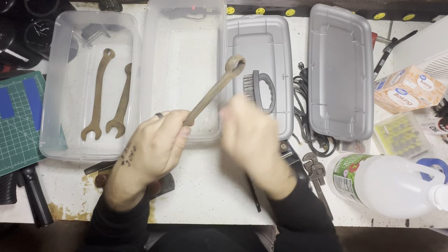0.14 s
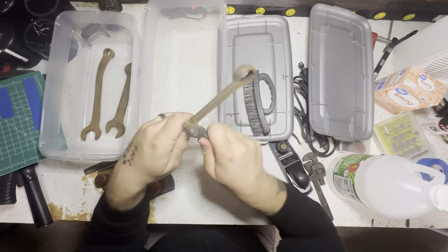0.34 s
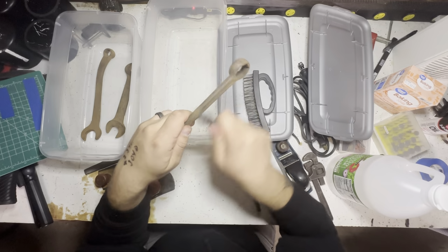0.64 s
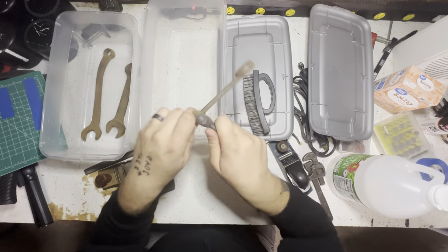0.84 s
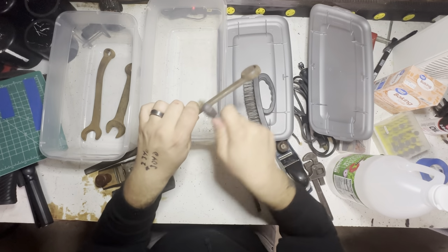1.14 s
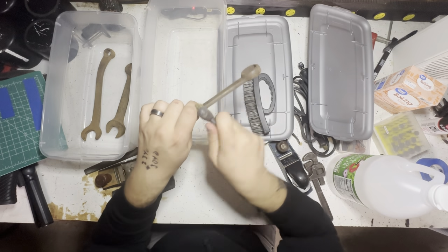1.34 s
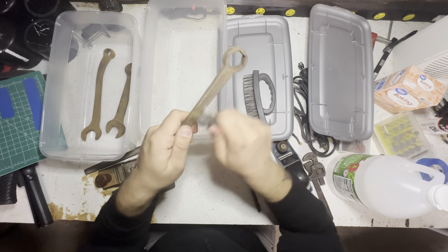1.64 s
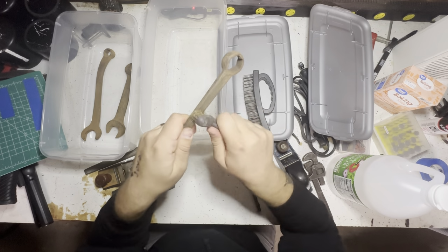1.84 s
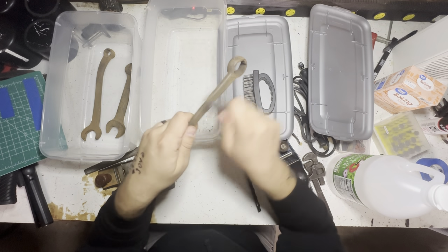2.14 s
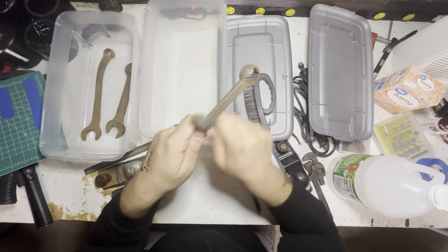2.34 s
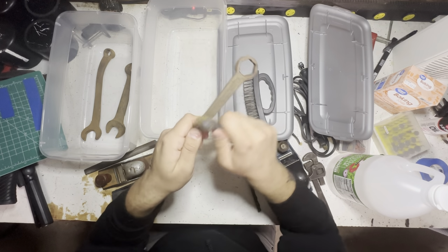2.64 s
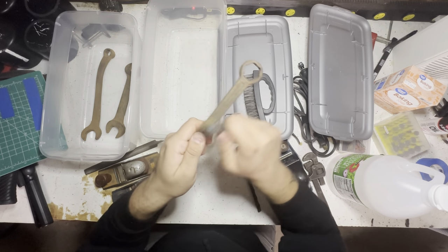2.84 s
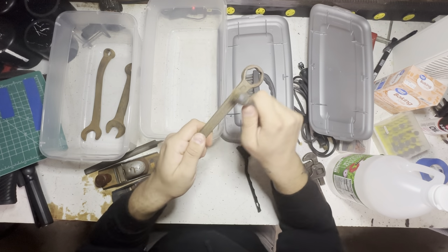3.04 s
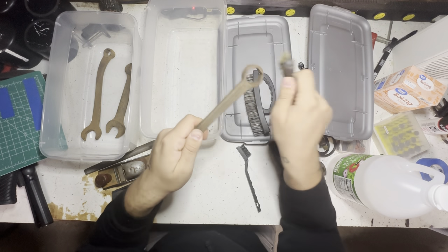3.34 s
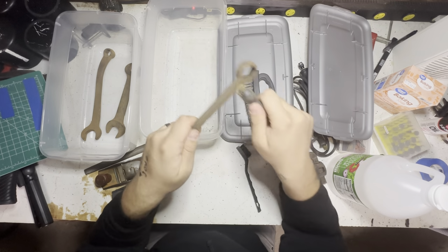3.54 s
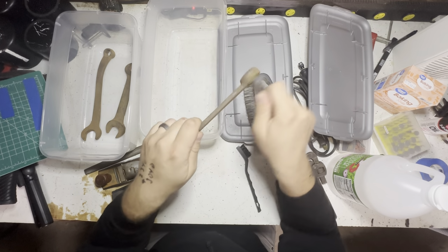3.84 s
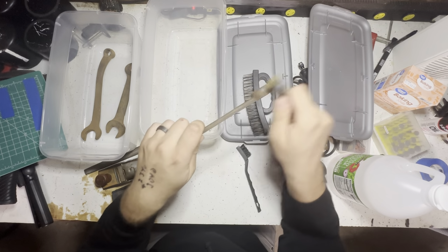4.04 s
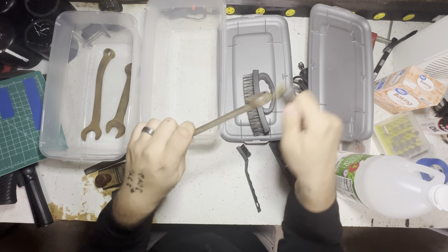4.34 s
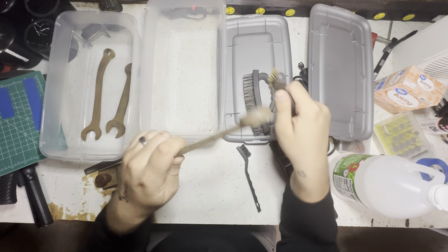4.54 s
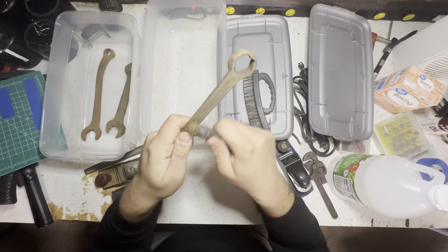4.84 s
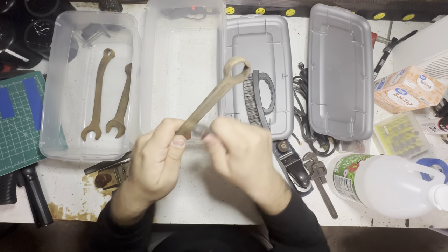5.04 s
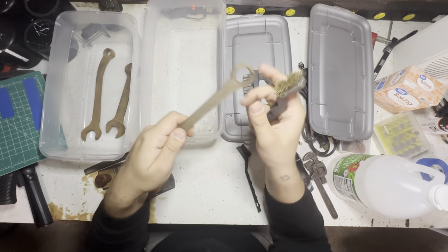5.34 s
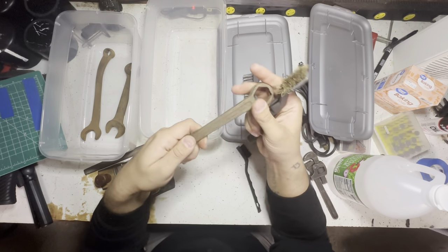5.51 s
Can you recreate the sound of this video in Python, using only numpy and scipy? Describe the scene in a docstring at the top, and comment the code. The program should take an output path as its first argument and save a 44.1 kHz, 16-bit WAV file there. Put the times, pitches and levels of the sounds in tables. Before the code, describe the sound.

A small wire brush scrubs a rusty steel wrench in quick back-and-forth strokes, a rasping hiss with a faint metallic ring. A wire squeaks briefly. Past halfway the strokes thin out and tools click and knock on the workbench, with one hard clatter standing out. A deep thump and a last faint stroke follow. It is heard close, from above, in a quiet small room.

```python
"""A small wire brush scrubs a rusty steel wrench in quick back-and-forth strokes, its tips snapping off
the rust and ringing the steel, while the workbench hums and bumps below. Just after 2 s a wire squeaks.
From 3.3 s the strokes thin out and things click and knock on the bench, hardest at 4 s; the top booms
deeply near 5.2 s and a last faint stroke follows. A close pair of microphone ports listens from above
in a quiet, small room."""
import sys
import numpy as np
from scipy import signal
from scipy.fft import rfft, irfft, next_fast_len
from scipy.io import wavfile
from scipy.ndimage import uniform_filter1d, map_coordinates

SR = 44100
rng = np.random.default_rng(int(sys.argv[2]) if len(sys.argv) > 2 else 0)


def to_wav(sig):
    """Store sig (one row per channel, or 1-D mono) as 16-bit WAV at the path in sys.argv[1].

    Samples outside -1..1 are clipped; the rate is SR.
    """
    pcm = np.clip(np.atleast_2d(sig), -1, 1) * 32767
    pcm = np.round(pcm).astype(np.int16)
    wavfile.write(sys.argv[1], SR, pcm.T)  # frames by channels


N = 250213

# brush strokes: bite t/s, run-up/s, time in contact/s, level at bite/dB, level at lift/dB, rasp/dB
STROKES = [(.002, .04, 0.052, -47.5, -46, 0), (.125, .05, 0.076, -46, -47, -1),
           (.267, 0.033, 0.058, -45, -44.5, -1.5), (.407, 0.058, 0.063, -45, -47, -0.5),
           (.542, 0.045, 0.055, -43, -47.5, -4.5), (.679, .075, 0.051, -45, -49, -3.5),
           (.771, 0.026, 0.062, -54, -41, -1.5), (.929, .055, 0.038, -44, -45, -2),
           (1.054, 0.038, 0.048, -46.5, -50, 5.5), (1.173, .028, 0.062, -47.5, -47, 2),
           (1.301, .029, 0.043, -51, -47.5, 6), (1.441, 0.049, .055, -46, -50, -2.5),
           (1.535, 0.016, 0.061, -54.5, -49, 2), (1.67, 0.033, 0.053, -49.5, -47.5, -1.5),
           (1.777, 0.03, .061, -51, -50, 1), (1.898, .037, 0.06, -51.5, -46.5, -1.5),
           (2.02, 0.057, 0.052, -47.5, -47, -0.5), (2.146, 0.053, 0.058, -48, -48, -1),
           (2.274, .042, 0.023, -45, -45.5, -1), (2.342, 0.022, 0.081, -55, -47.5, 1),
           (2.498, 0.071, 0.097, -60, -57, 0), (2.681, .07, 0.07, -52, -57, 1.5),
           (2.836, .065, 0.041, -53.5, -51.5, .5), (2.942, .028, 0.07, -52, -48.5, -2.5),
           (3.087, 0.034, 0.054, -49, -47.5, -0.5), (3.196, 0.015, 0.057, -50.5, -45, 1),
           (3.298, 0.068, .02, -46.5, -47.5, -2), (3.356, .01, 0.018, -48, -59, 2),
           (3.568, .006, 0.056, -59, -44, -1.5), (3.717, .05, 0.013, -53.5, -61.5, -3.5),
           (3.795, .008, 0.04, -58.5, -69, -3.5), (3.845, .015, 0.034, -50.5, -39.5, -8),
           (3.949, 0.044, 0.032, -58, -64, 0), (4.054, 0.031, 0.012, -43, -34, 0),
           (4.175, 0.026, 0.016, -47.5, -48, -4), (4.378, .007, 0.046, -46, -58, -6.5),
           (4.461, 0.051, 0.014, -43, -54.5, -4.5), (4.604, 0.11, 0.11, -63.5, -62, -1.5),
           (4.815, 0.014, 0.04, -70.5, -70, -1), (4.875, .022, 0.033, -51.5, -50.5, -2),
           (4.973, .02, .038, -52, -56.5, 0), (5.073, 0.032, 0.083, -46.5, -49.5, -4.5),
           (5.259, 0.087, 0.03, -68, -65, -7), (5.635, 0.035, 0.03, -66, -79, -2.5)]


def brush():
    """Wire tips catch on the rust and snap free: a rasping hiss over the ring of shank and jaw."""
    # tone as the brush wanders along the wrench: t/s, shank ring/dB, jaw ring/dB, treble/dB
    spots = [(0, -14.5, -25, -0.5), (.5, -14.5, -17, -2.5), (.95, -15, -13, -3.5), (1.4, -10, -8.5, 0),
             (1.9, -15, -16, -2), (2.4, -10, -7.5, 1.5), (2.8, -10.5, -9.5, 4.5), (3.2, -16.5, -5, 0),
             (3.6, -20, -14, -2), (4.1, -24, -15.5, -4), (4.6, -10, -11, -3.5), (4.949, -23.5, -14.5, 2.5),
             (5.3, -21.5, -21, -9.5)]
    shank_modes = [(864, 170, -5), (1073, 100, 1.5)]  # lowest bending modes: f/Hz, width/Hz, level/dB
    jaw_modes = [(1632, 230, -3.5), (2230, 360, -3), (2297, 150, 1)]  # modes of the jaw: f/Hz, width/Hz, level/dB
    spot_s, *spot_db = np.transpose(spots)
    shank_gain, jaw_gain, treble = (amp(curve(spot_s, db)) for db in spot_db)
    bite, _, hold, bite_db, lift_db, rasp_db = np.transpose(STROKES)
    contact_s = np.maximum.accumulate(np.ravel([bite, bite + hold], "F"))
    contact_db = curve(contact_s, np.transpose([bite_db, lift_db]))
    rasp = amp(2 + curve(contact_s, np.transpose([rasp_db, rasp_db])))
    pressure = stroke_envelope()
    sizzle = treble * (pressure / amp(contact_db)) ** 0.26  # a slowing brush loses its treble first
    hiss = steel_hiss()
    coarse = filtered(hiss, lambda f: 1 / (1 + (f / 5000) ** 8))  # deep rust rasps lower
    fine = filtered(hiss, lambda f: 1 - 1 / (1 + (f / 7700) ** 8))  # a flatter brush sizzles higher
    hiss = hiss + (rasp - 1) * coarse + (sizzle - 1) * fine
    ring = amp(-6) * shank_gain * wrench_ring(shank_modes)
    ring += amp(-5.5) * jaw_gain * wrench_ring(jaw_modes)
    ring *= amp(-0.43 * (contact_db - np.median(bite_db)))  # low modes ignore part of the extra force
    return pressure * (amp(3) * hiss + ring)


def stroke_envelope():
    """Every stroke speeds up, holds contact, slows and lingers faintly in the room."""
    run_up_db, fall_db_per_s = 15.5, 557.5
    room_db, room_t60 = -14, 0.12
    t, power = np.arange(N) / SR, 0
    for bite, run_up, hold, bite_db, lift_db, _ in STROKES:
        early, late = np.maximum(bite - t, 0), np.maximum(t - bite - hold, 0)
        level = amp(np.interp(t, [bite, bite + hold], [bite_db, lift_db]) - run_up_db * early / run_up)
        release, tail = amp(-fall_db_per_s * late), amp(room_db - 60 * late / room_t60)
        power += level ** 2 * (release ** 2 + tail ** 2)
    return np.sqrt(power)


def tip_snaps():
    """Three paths of grainy noise: thousands of tips let go in clumps of unequal size."""
    noise = rng.standard_normal((3, N))
    clumps = unit(uniform_filter1d(rng.standard_normal(N), size=12))
    return noise * amp(1.7 * clumps)


def steel_hiss():
    """The snapping bristles hiss and set the high modes of the wrench shimmering."""
    bristles = [(600, -26), (2000, -13.5), (2800, -5.5), (3400, -5.5), (5500, -4), (7800, -4), (10500, -2),
                (11300, -4.5), (11800, -9.5), (13600, -8.5), (15200, -4), (16500, -1)]  # spectrum of the wire tips: f/Hz, level/dB
    high_modes = [(2210, 24, -11), (2804, 67, -4), (3126, 45, 1.5), (3728, 180, -5.5), (4220, 150, -1.5),
                  (4540, 30, 0.5), (5150, 81, -7.5), (5800, 41, -8), (6140, 540, -0.5), (6140, 230, -8.5),
                  (6312, 100, 4), (6840, 300, -2), (8870, 110, -3.5), (9300, 230, -3.5), (10030, 91, 0),
                  (10830, 120, -4), (15650, 300, -7)]  # high modes of the wrench: f/Hz, width/Hz, level/dB
    grip = [(0, -8), (.7, -5.5), (1.3, -4.5), (1.8, -4.5), (2.3, -4), (2.7, -2), (3.2, -4.5), (3.9, -3.5),
            (4.5, -6.5), (5.1, -7.5)]  # a looser grip lets the steel ring more: t/s, level/dB

    def peaks(f):
        return np.sqrt(sum(amp(db) ** 2 / (1 + (2 * (f - hz) / width) ** 4)
                           for hz, width, db in high_modes))

    steel = amp(curve(*np.transpose(grip)) - 2.5) * unit(filtered(tip_snaps(), peaks))
    hiss = unit(filtered(tip_snaps(), eq(bristles))) + steel
    hiss = patchy(hiss, depth_db=2, bins=3, frames=9)  # each tuft meets another spot of the steel
    return unit(patchy(hiss, depth_db=2, bins=4, frames=12, size=1024))  # hand and bench echoes shift


def wrench_ring(table):
    """The snapping tips keep a set of low wrench modes ringing unevenly."""
    return unit(patchy(filtered(tip_snaps(), modes(table)), depth_db=4.5, bins=2, frames=7))


def knocks():
    """Each knock rings the bench top, low modes swelling last; it shudders on and loose things clatter."""
    # knocks on the bench: t/s, body level/dB, tilt/(dB per octave), thump/dB, clatter/dB, swell/s, t60/s
    hits = [(0.34, -58, -10.5, -31, -75, 0.0059, 0.18), (.41, -60, -6.5, -44, -62, 0.0059, 0.27),
            (.617, -64, -12, -46.5, -72, 0.013, 0.37), (.978, -44, 4, -62, -53, 0.037, .26),
            (1.225, -52.5, -3, -52, -57, 0.017, 0.25), (2.074, -61, -4, -46, -59, 0.013, 0.22),
            (2.33, -47.5, 9.5, -37, -43.5, 0.0028, 0.12), (2.356, -52.5, -6, -67, -51.5, 0.019, 0.46),
            (3.28, -46, -0.5, -37.5, -51, 0.026, 0.42), (3.353, -28.5, -3.5, -38.5, -46.5, 0.0076, 0.16),
            (3.405, -39, -2, -43, -67.5, 0.017, 0.22), (3.575, -59.5, -5, -42, -66, 0.019, 0.28),
            (3.635, -51.5, -4, -35, -62.5, 0.014, 0.29), (3.681, -32, -3.5, -44, -58.5, 0.0089, 0.083),
            (3.765, -51, 3.5, -57.5, -55.5, 0.0027, 0.05), (3.895, -52.5, -2, -30, -65, 0.015, 0.21),
            (3.949, -56, -1.5, -53.5, -53.5, .01, 0.24), (4.024, -12, 3.5, -26.5, -22.5, 0.0032, 0.098),
            (4.052, -19.5, -2, -30, -34, .0056, 0.18), (4.085, -19, 3, -41, -33.5, 0.0053, 0.1),
            (4.121, -34, -3.5, -41, -38.5, 0.011, .13), (4.16, -35.5, 0, -39, -46, 0.013, 0.22),
            (4.21, -50, -0.5, -44, -57.5, 0.02, 0.57), (4.563, -53, -2, -54, -63, 0.0021, 0.33),
            (4.82, -78, -16, -41.5, -87, 0.017, 0.24), (5.154, -33, -10.5, -18, -51, 0.015, .17)]
    bench_modes = [(56.3, 42, 2), (100.2, 19, 2), (138.7, 20, -3), (161.7, 23, -3.5), (206.5, 32, 0),
                   (236.9, 20, 3), (297, 68, -7.5), (380.8, 97, -0.5), (433.6, 52, 1), (505, 140, -4.5),
                   (550.4, 52, -5), (117.6, 11, 3.5), (601.7, 140, -2), (719, 120, -2.5), (826, 83, -3),
                   (939, 50, -8)]  # modes of the top: f/Hz, width/Hz, level/dB
    loose_things = [(500, -33.5), (1000, 0.5), (1500, -0.5), (2500, -8.5), (5000, -26.5), (10000, -32),
                    (16500, -40.5)]  # spectrum of the clatter: f/Hz, level/dB
    thump_hz, body_hz, pivot_hz, clatter_hz = 60, (115, 420), 230, 800
    out, t = np.zeros((3, N)), np.arange(round(.5 * SR)) / SR
    hz, _, mode_db = np.transpose(bench_modes)[:, None, :, None]
    for start, db, tilt_db, thump_db, clatter_db, swell, t60 in hits:
        body = [(f, db + tilt_db * np.log2(f / pivot_hz)) for f in body_hz]
        blow = eq([(thump_hz, thump_db), *body, (clatter_hz, clatter_db + 1.5)])
        attack = 1 - np.exp(-(t / (swell * (pivot_hz / hz) ** 0.26)) ** 2)
        scatter_db, phase = rng.standard_normal((2, 3, len(bench_modes), 1))
        decay = amp(mode_db + scatter_db - 60 * t / t60) * (1 - t / t[-1])
        ring = blow(hz) * attack * decay * np.sin(2 * np.pi * hz * t + 3 * phase)
        shudder = filtered(burst(1.36 * swell, 1.81 * t60, .5), lambda f: blow(f) * modes(bench_modes)(f))
        clatter = filtered(burst(0.48 * swell, 1.38 * t60, .5), at_level(eq(loose_things), clatter_db))
        add(out, start, ring.sum(1) + amp(20.5) * shudder + clatter)
    return out


def clicks():
    """Short hard contacts ring the tools, each around its own pitch; the room answers faintly."""
    contacts = [(1.151, -49, 1300), (2.332, -38, 980), (2.536, -47.5, 1200), (2.676, -59, 690),
                (2.761, -61, 1400), (3.271, -20, 1990), (3.357, -35.5, 9100), (3.375, -47, 8000),
                (3.485, -62, 8500), (3.566, -48, 6500), (3.657, -50.5, 1300), (3.683, -45, 590),
                (3.88, -51.5, 9000), (3.955, -49.5, 3300), (4.022, -25, 7100), (4.101, -47.5, 480),
                (4.12, -28.5, 2000), (4.164, -35.5, 1300), (4.399, -54.5, 2800), (4.46, -49.5, 270),
                (4.566, -46.5, 597), (4.873, -52.5, 4000), (4.97, -67.5, 1000), (5.171, -44.5, 614),
                (5.29, -62.5, 4500)]  # hard clicks: t/s, level/dB, centre f/Hz
    tool_modes = [(940, 390, -2.5), (1450, 380, -1.5), (1830, 260, -7), (2800, 300, -2.5), (3260, 430, -7),
                  (4240, 410, 0.5), (4840, 400, -6.5), (6550, 960, 2)]  # hand-damped modes of the tools: f/Hz, width/Hz, level/dB
    out = np.zeros((3, N))
    for start, db, hz in contacts:
        snap = burst(rise=.0007, t60=0.04, length=.4)
        room = amp(-27.5) * burst(rise=0.0082, t60=0.86, length=.4)
        colour = lambda f: (0.39 + modes(tool_modes)(f)) * modes([(hz, 1.7 * hz, 0)])(f) ** 2
        add(out, start, filtered(snap + room, at_level(colour, db)))
    return out


def squeaks():
    """A wire drags along an edge and sings in one narrow band."""
    drags = [(2.077, -50.5, 2440, 160, 0.42), (2.13, -60, 2270, 160, .2)]  # wire squeaks: t/s, level/dB, f/Hz, width/Hz, t60/s
    out = np.zeros((3, N))
    for start, db, hz, width, t60 in drags:
        friction = burst(rise=0.014, t60=t60, length=0.67)
        add(out, start, filtered(friction, at_level(modes([(hz, width, 0)]), db)))
    return out


def bench_hum():
    """Shaken by the arms, the top gives a wavering hum; a dragged sleeve or tool rubs on it."""
    shaking = [(0, -51, -71.5), (.22, -56, -72), (.45, -50.5, -80.5), (.77, -47.5, -71), (1.0, -49, -63),
               (1.18, -56.5, -59.5), (1.44, -54, -69), (1.77, -58, -72.5), (2.34, -54, -66.5),
               (2.55, -53.5, -71.5), (2.78, -63, -80), (3.2, -64.5, -80), (3.52, -59.5, -67),
               (3.7, -49.5, -67), (3.79, -64.5, -70), (3.96, -52.5, -67), (4.3, -58, -62), (4.5, -58, -79),
               (4.79, -65.5, -85), (5.0, -63, -81), (5.14, -55, -74), (5.4, -58.5, -83), (5.67, -62, -92)]  # stirring of the top: t/s, hum level/dB, rub level/dB
    hum_colour = [(15, -20.5), (30, -18), (50, -1.5), (68, 3), (90, -5), (130, -17.5), (200, -31),
                  (400, -51.5)]  # spectrum of the hum: f/Hz, level/dB
    rub_modes = [(258.4, 100, -12.5), (350, 85, -1), (564, 27, -3.5), (734, 200, -14)]  # modes that dragging excites: f/Hz, width/Hz, level/dB
    times, hum_db, rub_db = np.transpose(shaking)
    hum = filtered(rng.standard_normal((3, N)), eq(hum_colour))
    rub = filtered(rng.standard_normal((3, N)), modes(rub_modes))
    rub = patchy(rub, depth_db=-0.5, bins=2, frames=15)
    hum_gain = amp(curve(times, hum_db) + 3.5 * wobble(rate=5))
    rub_gain = amp(curve(times, rub_db) + 2.8 * wobble(rate=8.9))
    return hum_gain * unit(hum) + rub_gain * unit(rub)


def room_tone():
    """The quiet room: a steady bed of low rumble and faint hiss."""
    air = [(20, -11), (130, -17.5), (250, -42), (400, -48), (900, -47.5), (3000, -46), (6500, -53.5),
           (9000, -64.5), (16500, -68)]  # spectrum of the room tone: f/Hz, level/dB
    return amp(-64.5) * unit(filtered(rng.standard_normal((3, N)), eq(air)))


def ports(paths, bass_width_db):
    """Three paths to stereo: one reaches both ports, with a phase lead; the others reach one each."""
    spread = [(60, -22.5), (250, -12), (500, 3), (900, -1.5), (2000, -11.5), (3500, -5), (4800, -3),
              (6200, -8), (7600, -5.5), (10300, -7), (11200, -19.5), (11500, -31), (13600, -41.5),
              (14200, -3.5), (16000, -11)]  # share that differs between the ports: f/Hz, level/dB
    lead = [(900, 0), (2000, 0), (3450, -.1), (4800, -.6), (6200, .8), (7600, 1.8), (9000, 1.8),
            (10300, 2.5), (11300, np.pi), (13700, np.pi), (14500, 3.9), (16000, 4.3)]  # how far the right port leads: f/Hz, phase/rad
    balance = [(60, 2.5), (450, 2.5), (800, 1.5), (1100, -.8), (2500, -.5), (3200, 1), (5000, 1.5),
               (6000, .2), (11000, 0)]  # left minus right: f/Hz, level/dB
    side = np.array([[-.5], [.5]])
    apart = lambda f: 1.02 * np.tanh(amp(along(spread, f) + bass_width_db / (1 + (f / 650) ** 4)) / 0.77)
    alike = lambda f: np.sqrt(np.abs(1 - apart(f) ** 2))
    shared = filtered(paths[[0, 0]], lambda f: alike(f) * np.exp(1j * side * along(lead, f)))
    own = filtered(paths[1:], apart)
    return filtered(shared + own, lambda f: amp(-side * along(balance, f)))


def amp(db):
    """Gain of a level in dB."""
    return 10 ** (np.asarray(db) / 20)


def unit(x):
    """x at rms 1."""
    return x / np.sqrt(np.mean(x ** 2) + 1e-20)


def along(points, hz):
    """Reads (f/Hz, value) points at hz, on a log axis."""
    f, values = np.transpose(points)
    return np.interp(np.log(hz + 1), np.log(f + 1), values)


def eq(points):
    """Response through (f/Hz, level/dB) points."""
    return lambda f: amp(along(points, f))


def curve(times, values):
    """Straight lines through the points, one value per sample."""
    return np.interp(np.arange(N) / SR, np.ravel(times), np.ravel(values))


def wobble(rate):
    """A smooth random curve, rate knots a second."""
    return map_coordinates(rng.standard_normal(int(N * rate / SR) + 4), [np.arange(N) * rate / SR])


def filtered(x, response):
    """x through a complex frequency response."""
    n = x.shape[-1]
    padded = next_fast_len(n + SR // 8)
    return irfft(rfft(x, padded) * response(np.fft.rfftfreq(padded, 1 / SR)), padded)[..., :n]


def modes(table):
    """Causal response of a set of resonances, alternating in polarity."""
    return lambda f: sum((-1) ** k * amp(db) * 1j * f * width / (hz * hz - f * f + 1j * f * width)
                         for k, (hz, width, db) in enumerate(table))


def at_level(response, db):
    """The response scaled so that white noise of rms 1 leaves at db."""
    return lambda f: response(f) * amp(db) / np.sqrt(np.mean(np.abs(response(f)) ** 2))


def patchy(x, depth_db, bins, frames, size=256):
    """Random gain patches in time and frequency, shared by all paths."""
    spectra = signal.stft(x, nperseg=size)[2]
    patches = uniform_filter1d(rng.standard_normal(spectra.shape[1:]), bins, 0)
    patches = uniform_filter1d(patches, frames, 1)
    return signal.istft(spectra * amp(depth_db * unit(patches)), nperseg=size)[1][:, :N]


def burst(rise, t60, length):
    """Three paths of noise that swells and dies; times in seconds."""
    t = np.arange(round(length * SR)) / SR
    attack = 1 - np.exp(-(t / rise) ** 2)
    decay = amp(-60 * t / t60) * (1 - t / length)
    return attack * decay * rng.standard_normal((3, len(t)))


def add(out, start, x):
    """Mixes x into out from start, in seconds."""
    part = out[:, round(start * SR):][:, :x.shape[1]]
    part += x[:, :part.shape[1]]


def scene():
    """All sources at the two ports; the booming knocks sit narrower in the bass than the rest."""
    wide = brush() + clicks() + squeaks() + bench_hum() + room_tone()
    return ports(wide, bass_width_db=6) + ports(knocks(), bass_width_db=-10)


def record(dry):
    """A soft clip rounds off the loudest peaks, then a steep low-pass trims the top."""
    ceiling, top_hz = .93, 15850
    rounded = dry / (1 + np.abs(dry / ceiling) ** 6) ** (1 / 6)
    return filtered(rounded, lambda f: f < top_hz)


dry = scene()
out = record(dry)
to_wav(out)
```